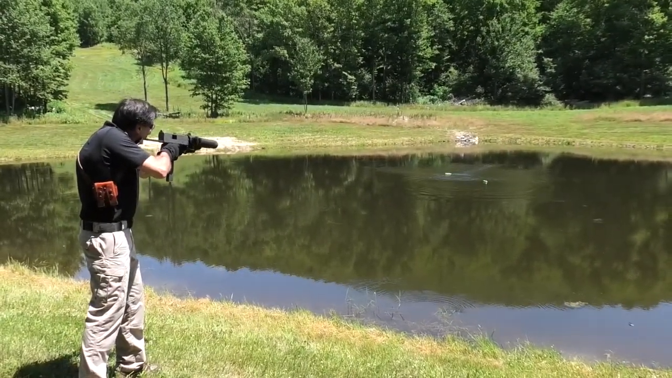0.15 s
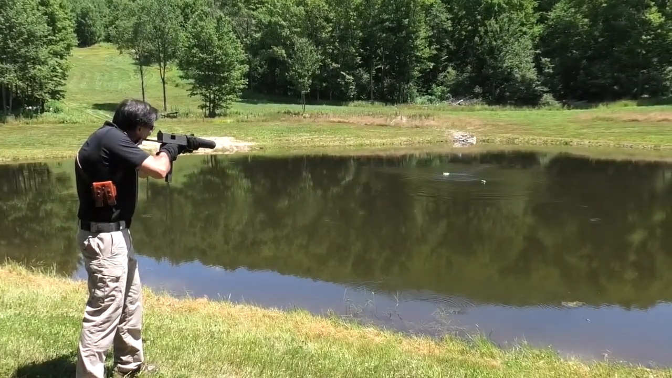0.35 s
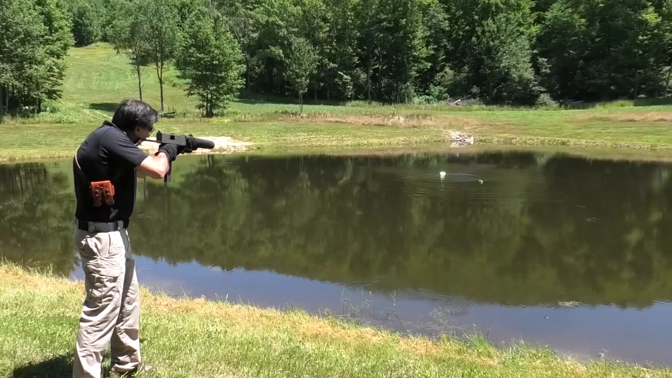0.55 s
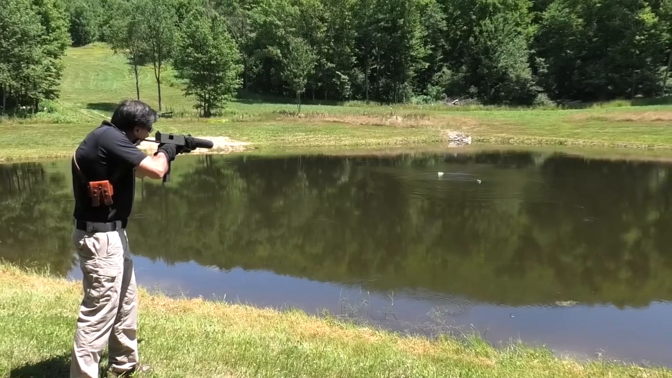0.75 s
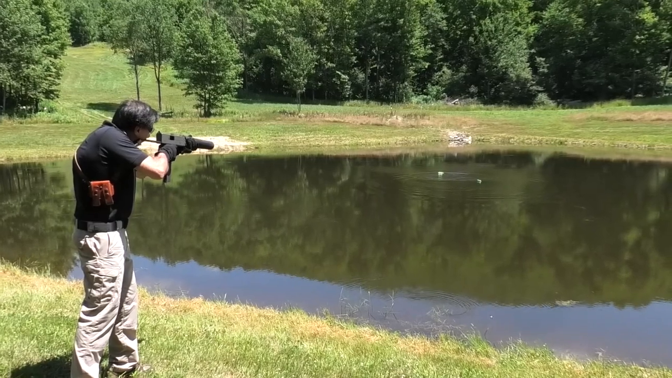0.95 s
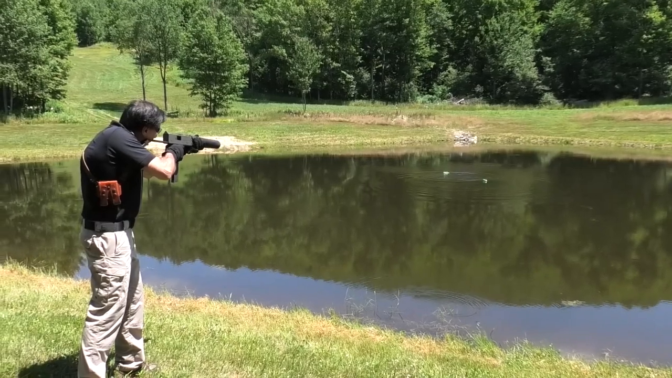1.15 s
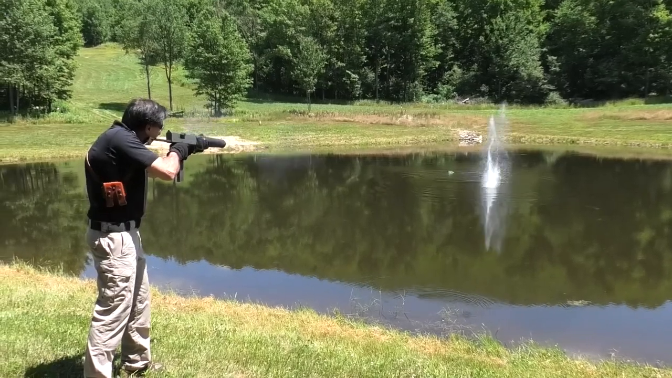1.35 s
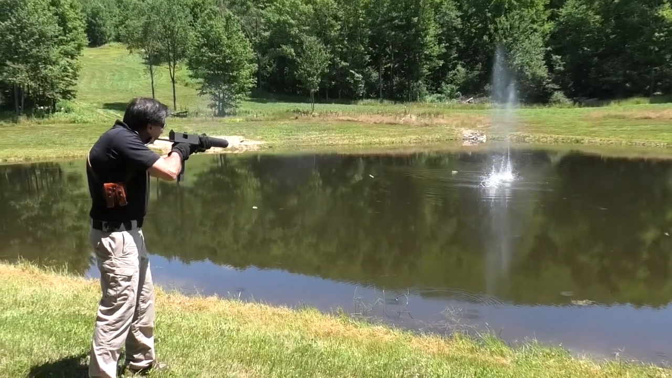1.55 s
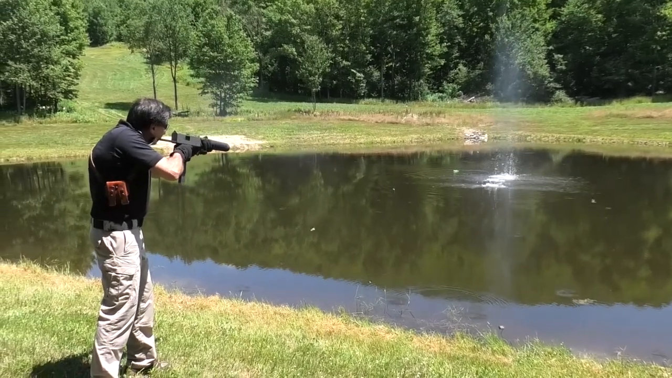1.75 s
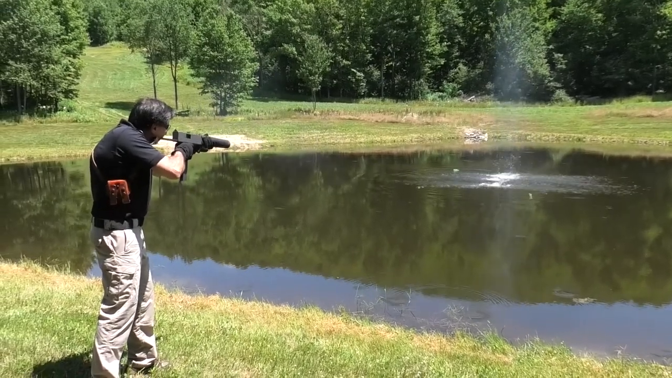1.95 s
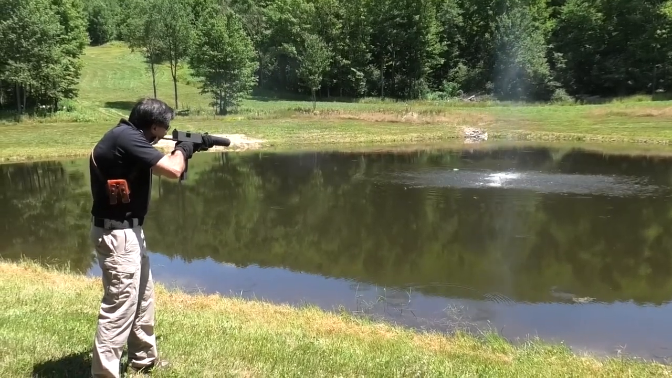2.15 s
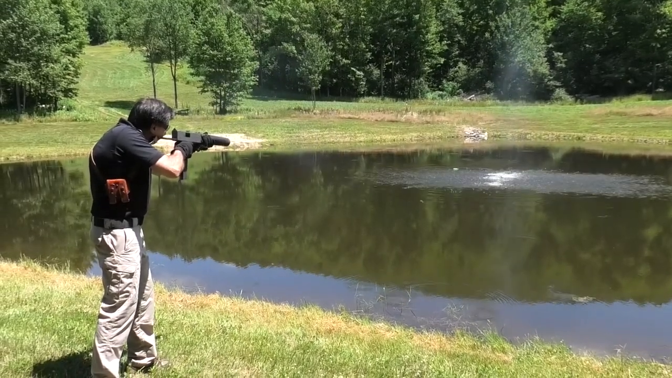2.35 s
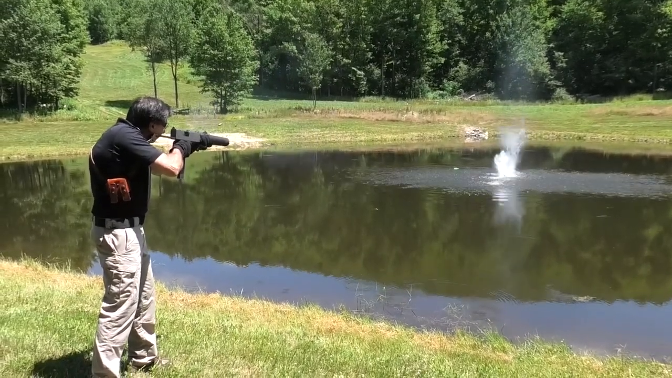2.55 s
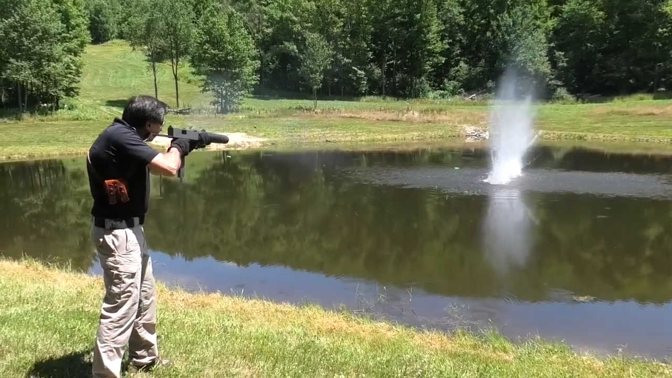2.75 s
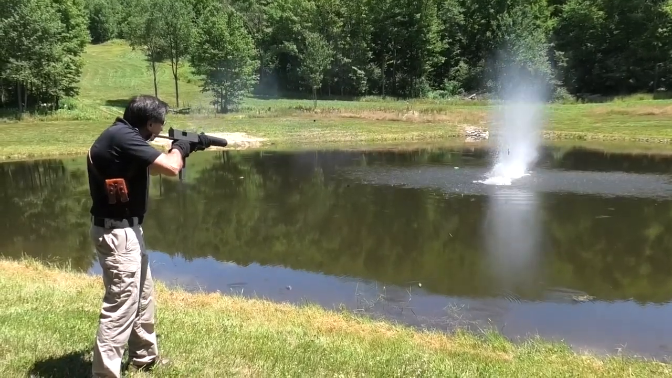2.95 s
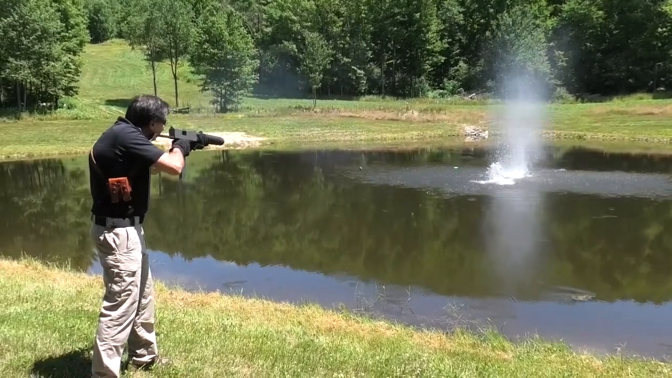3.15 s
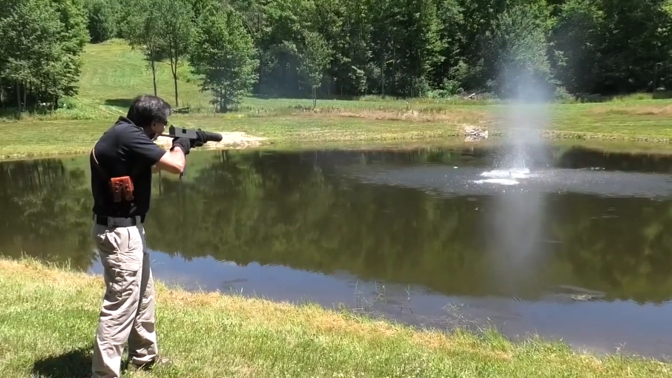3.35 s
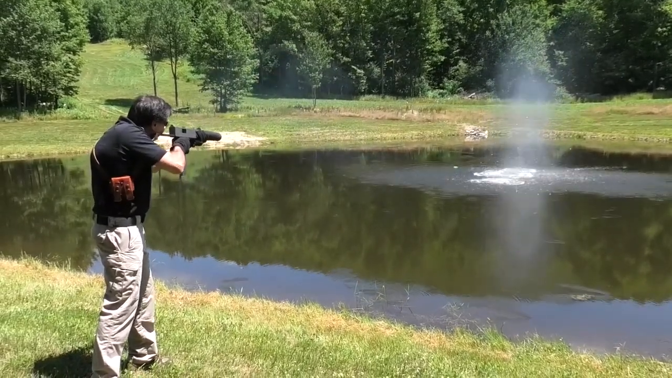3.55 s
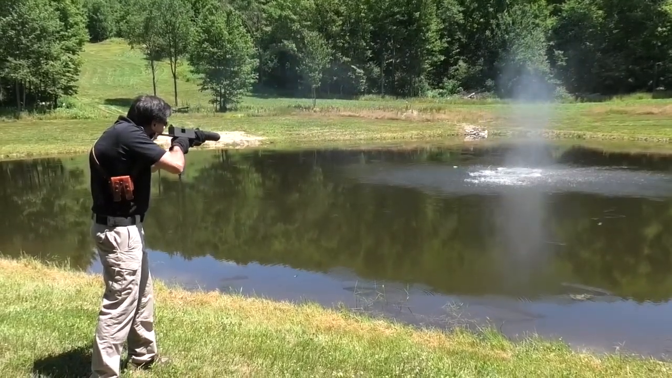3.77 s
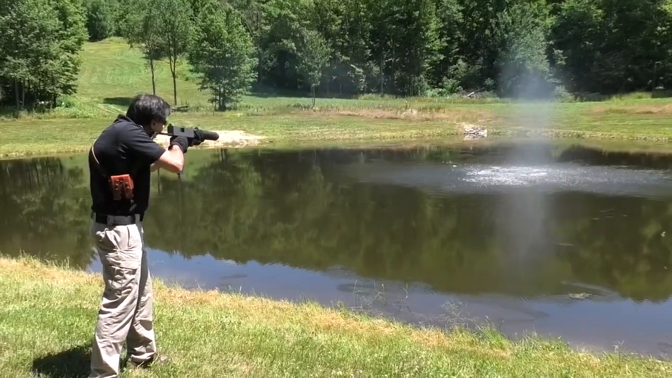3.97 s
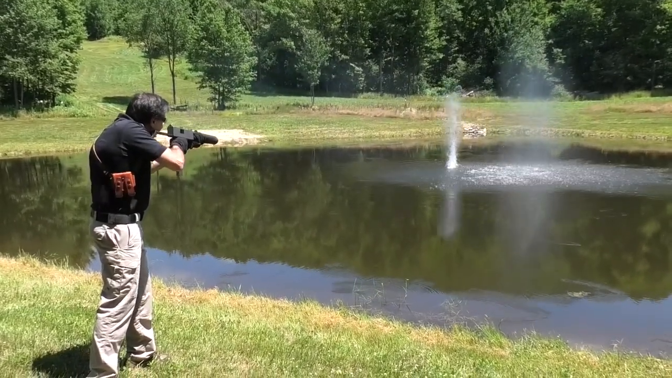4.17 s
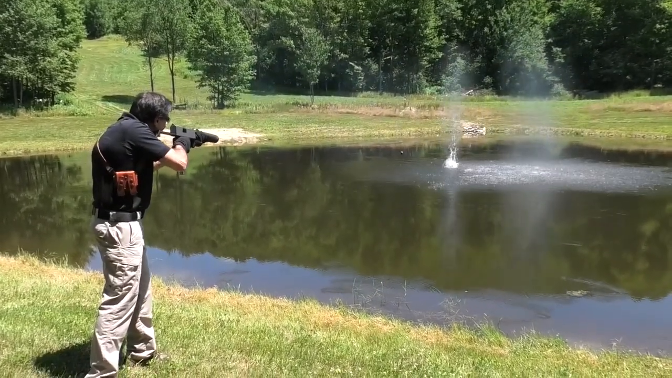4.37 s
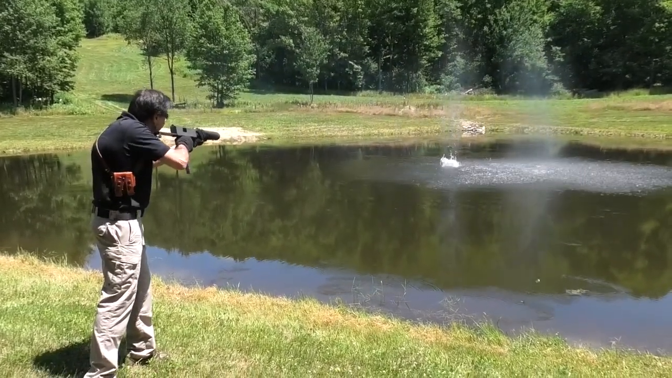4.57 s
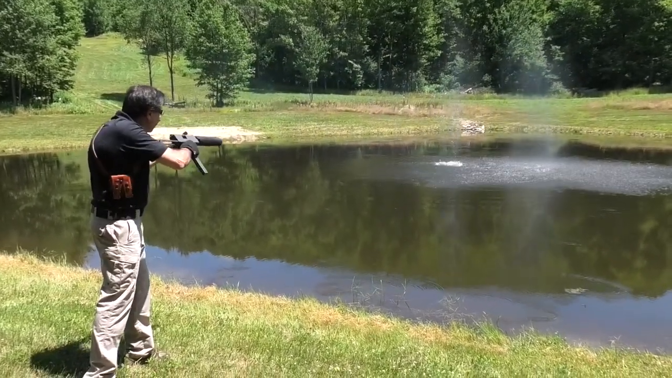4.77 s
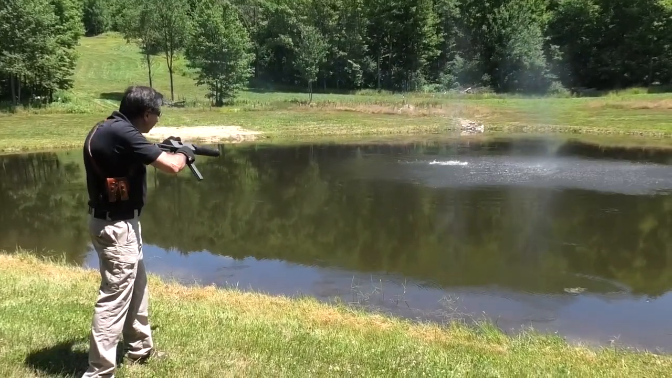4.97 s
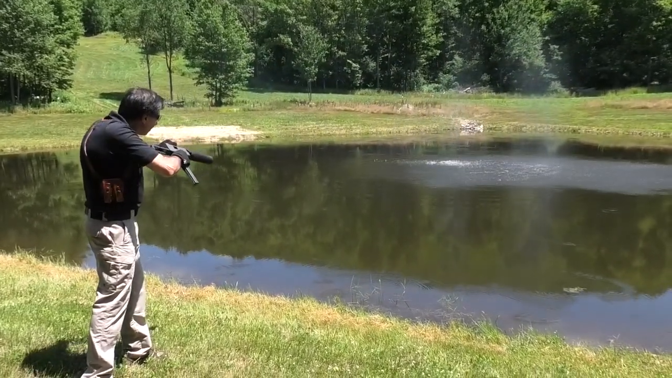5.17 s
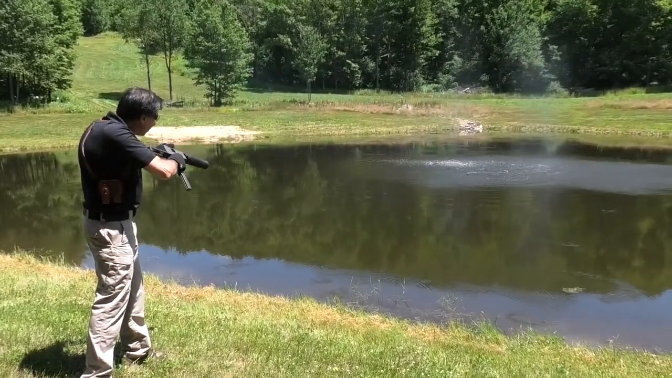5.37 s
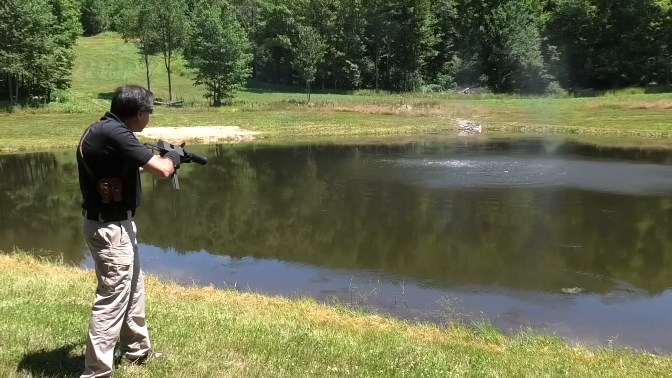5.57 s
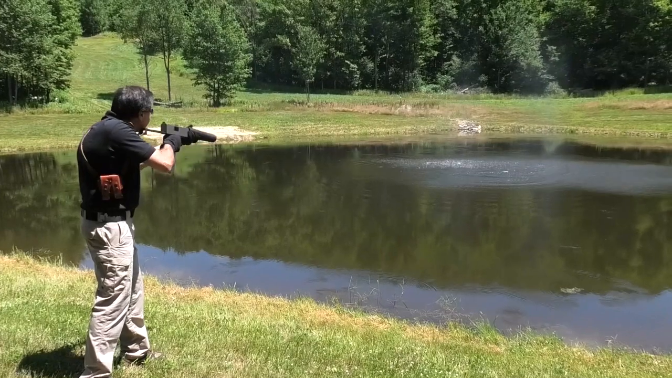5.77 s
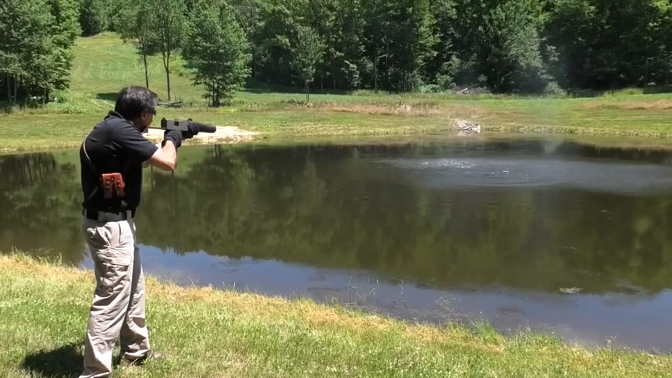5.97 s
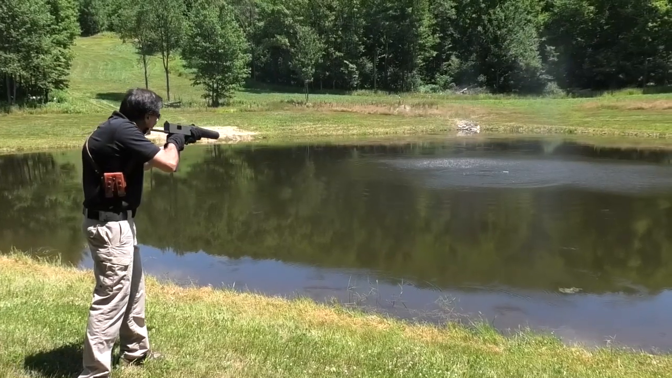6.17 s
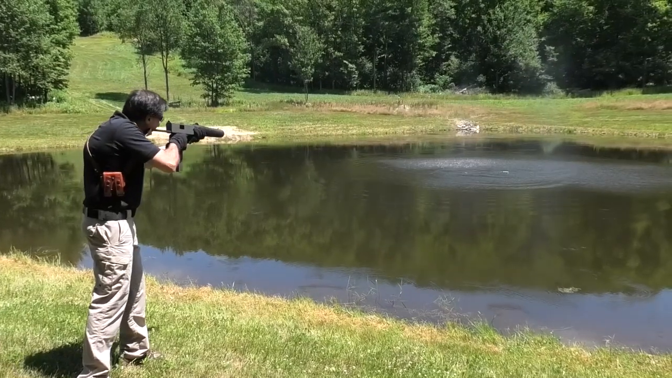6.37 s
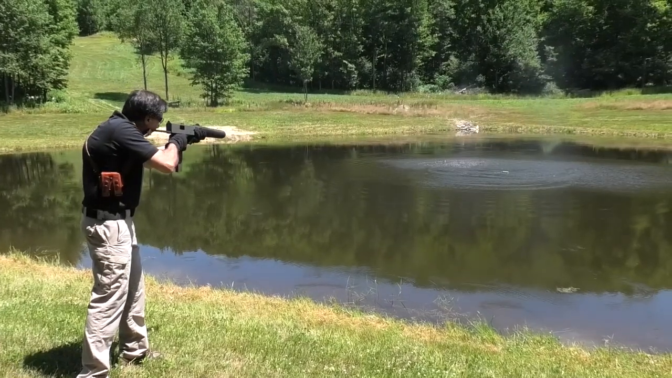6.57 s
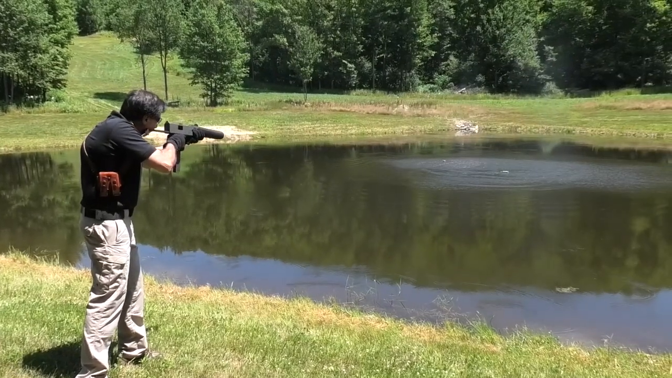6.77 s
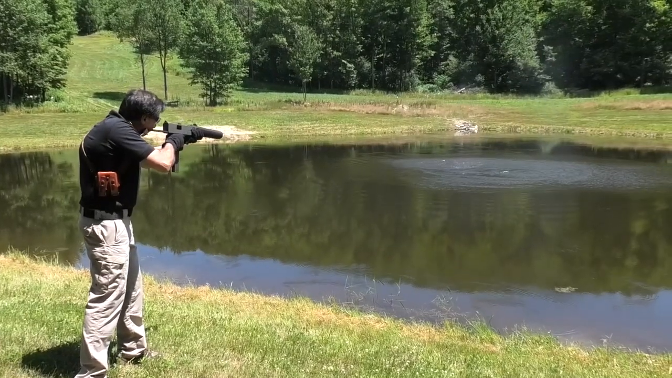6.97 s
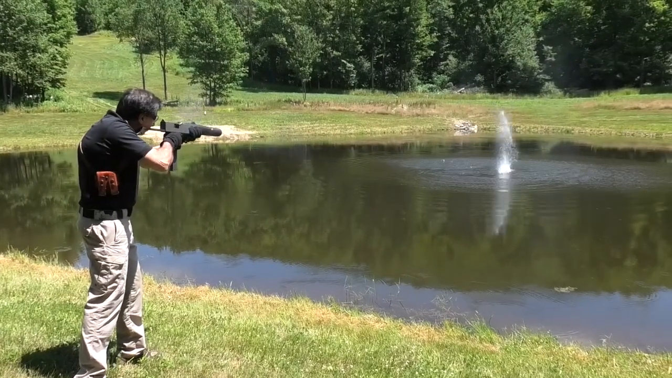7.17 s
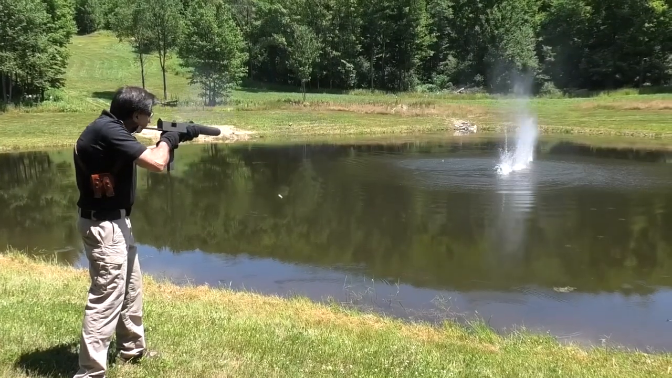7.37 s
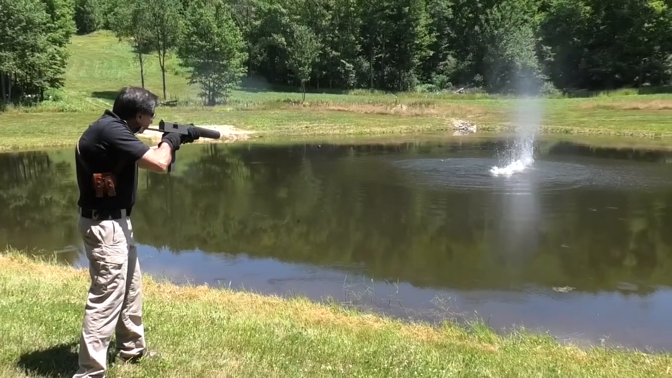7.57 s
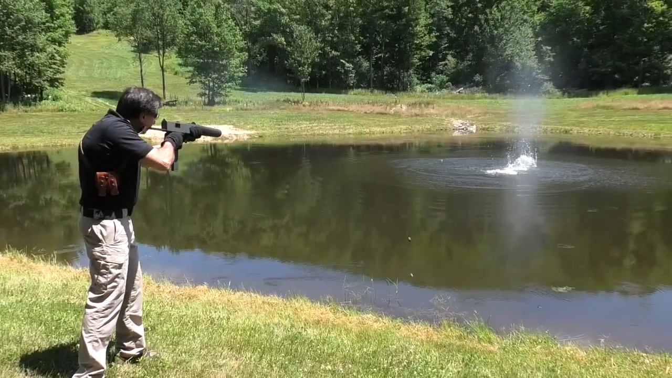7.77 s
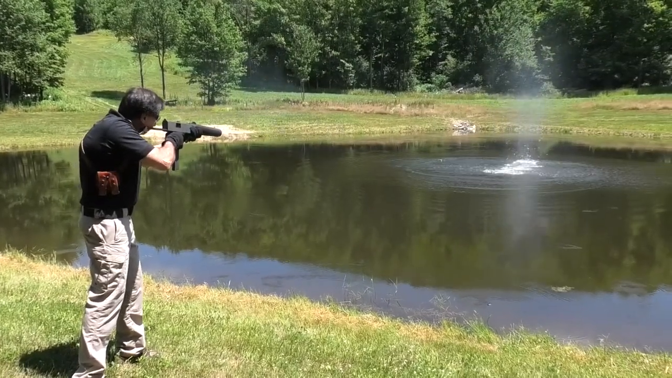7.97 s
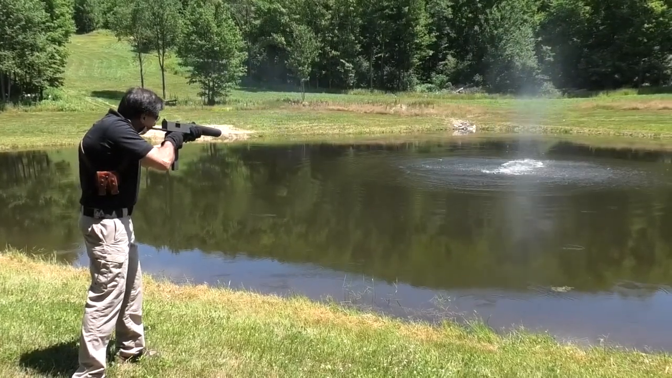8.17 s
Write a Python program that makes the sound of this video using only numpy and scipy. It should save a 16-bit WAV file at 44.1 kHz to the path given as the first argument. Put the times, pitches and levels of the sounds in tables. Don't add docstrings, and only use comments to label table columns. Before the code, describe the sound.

Close, dry metallic bursts from a silenced gun, each followed by plopping water hits and hissing echo, amid light breeze, birdsong and handling clicks.

```python
import sys
import numpy as np
from scipy import signal
from scipy.fft import rfft, irfft, next_fast_len
from scipy.io import wavfile
from scipy.ndimage import uniform_filter1d

SR = 44100
rng = np.random.default_rng(int(sys.argv[2]) if len(sys.argv) > 2 else 0)


def voltage_ratio(decibels):
    exponent = np.asarray(decibels, float) / 20
    return 10 ** exponent


def output_pcm(signal):
    pcm = np.clip(np.atleast_2d(signal).T, -1, 1) * 32767
    wavfile.write(sys.argv[1], SR, np.round(pcm).astype(np.int16))


N = 362502
FAST = next_fast_len(N)
T = np.arange(4096) / SR

# start_s, sear_db, first_rub_db, second_rub_db, first_rub_delay_s
PULLS = [
    (1.2245, -5.5, -19, -12, 0.011),
    (2.4767, -7.5, -19, -9.5, 0.012),
    (4.04, -10, -18, -10, 0.0123),
    (7.1007, -8, -17.5, -11, 0.013),
]
# start_s, gas_crack_db, muzzle_pop_db, bolt_stop_db
SHOTS = [(1.259, 0, -19.5, -33.5), (1.3106, -10, -21, -27), (1.365, -8.5, -22, -26.5),
         (1.4172, -11, -20, -23), (2.5085, -3.5, -15, -23), (2.563, -9, -19.5, -27),
         (2.613, -10.5, -20.5, -26), (2.6615, -10, -19, -26), (2.7097, -11, -20.5, -26.5),
         (2.7618, -10, -17.5, -30), (2.809, -10, -22.5, -22), (4.0729, -3, -13, -23),
         (7.133, -5.5, -13, -22.5), (7.181, -10, -21.5, -26), (7.2294, -11.5, -24, -25),
         (7.2778, -10.5, -23, -25), (7.325, -11, -23.5, -23)]
# start_s, level_db, pitch_hz, t60_s, churn_db
PLUNGES = [(1.3695, -11.5, 150, 0.024, -6), (1.421, -12, 123, 0.02, -9), (1.461, -20, 191, 0.066, -6),
           (1.5263, -10.5, 203, 0.057, -4.5), (2.623, -16.5, 257, 0.042, -4), (2.676, -21, 179, 0.047, 1),
           (2.7627, -8.5, 142, 0.024, 0), (2.821, -24.5, 169, 0.074, -4), (2.873, -11.5, 710, 0.027, -4),
           (2.877, -22, 266, 0.085, -17), (2.888, -25.5, 250, .1, -10), (2.9195, -16, 767, 0.048, 6.5),
           (4.189, -10.5, 218, 0.045, 0), (7.2402, -15, 222, 0.029, -17.5), (7.285, -23.5, 175, 0.03, 12),
           (7.344, -23, 167, 0.031, -12), (7.398, -12, 260, 0.019, 8.5), (7.4519, -8, 590, 0.018, -16),
           (7.4521, -4.5, 248, 0.026, -13)]
# start_s, ring_db, crack_db
LATCH_HITS = [
    (5.310, -51, -22),
    (5.4447, -26, -12.5),
]


def curve(table, hz):
    f, db = np.transpose(table)
    return np.interp(np.log(np.maximum(hz, 1)), np.log(f), db)


def colour(x, table):
    cep = irfft(np.log(voltage_ratio(curve(table, np.arange(257) * SR / 512))))
    cep[1:256] *= 2
    cep[257:] = 0
    h = irfft(np.exp(rfft(cep)))
    h = h / np.sqrt(np.sum(h ** 2))
    h = h.reshape((1,) * (x.ndim - 1) + (-1,))
    return signal.fftconvolve(x, h, axes=-1)[..., :x.shape[-1]]


def band(x, hz, octaves):
    edges_hz = np.clip(hz * 2 ** (np.array([-.5, .5]) * octaves), 20, .45 * SR)
    y = signal.sosfilt(signal.butter(2, edges_hz, "band", fs=SR, output="sos"), x)
    return y / y.std()


def fade(t, t60, rise=0.00015):
    t = np.maximum(t, 0)
    return (1 - np.exp(-t / rise)) * np.exp(-np.log(1000) * t / t60)


def ring(t, hz, t60):
    return np.sin(2 * np.pi * hz * t) * fade(t, t60, rise=.0001)


def walk(rate_hz):
    k = int(SR / rate_hz)
    steps = np.repeat(rng.standard_normal(N // k + 1), k)
    return 2.26 * uniform_filter1d(uniform_filter1d(steps, k), k)[:N]


def add(out, s, x, pan_db=0., wide=None):
    i = int(s * SR)
    pair = x * voltage_ratio(np.array([[pan_db], [-pan_db]]) / 2)
    if wide is not None:
        pair = pair + wide * np.array([[1], [-1]])
    out[:, i:i + len(x)] += pair[:, :N - i]


def since_blast(t):
    starts_s = np.sort([-99] + [row[0] for row in SHOTS + PLUNGES])
    return t - starts_s[np.searchsorted(starts_s, t) - 1]


def clamped(depth, release_s):
    return 1 - depth * np.exp(-since_blast(np.arange(N) / SR) / release_s)


def returns(layer, order):
    # return_db, brighter_db_per_layer, deeper_db, decay_stretch
    aims = [
        (-1.43, 1.56, 4.5, 0.99),
        (1.5, 0.15, -5, 0.96),
        (0.5, 0.34, 2, 0.99),
        (1.33, 0.2, 0.5, 0.97),
    ]
    duck_db, recover_s = 37, 0.45
    _, calm_db, db, build_s, t60, late_db, late_t60 = layer
    t = np.arange(0, N + 128, 128) / SR
    shot_s = np.array(SHOTS)[:, :1]
    string = np.searchsorted(np.array(PULLS)[:, 0], shot_s[:, 0]) - 1
    aim_db, bright_db, deep_db, stretch = np.array(aims)[string].T
    age_s = np.maximum(t - shot_s, 0)
    build = 1 - np.exp(-(age_s / build_s) ** 2)
    early = voltage_ratio(-120 * age_s / (t60 * stretch[:, None]))
    late = voltage_ratio(2 * late_db - 120 * age_s / late_t60)
    shot_db = db + aim_db + order * bright_db + (order < -1) * deep_db
    power = voltage_ratio(2 * calm_db) + voltage_ratio(2 * shot_db) @ (build * (early + late))
    level_db = 10 * np.log10(power) - duck_db * np.exp(-since_blast(t) / recover_s)
    return np.interp(np.arange(N) / SR, t, level_db)


def air():
    # freq_hz, density_db_per_hz
    breeze = [(12, -29), (20, -9), (70, 3.5), (193, 5), (248, -0.5), (400, 1), (520, -54), (880, -120)]
    hz = np.arange(FAST // 2 + 1) * SR / FAST
    spectrum = rfft(rng.standard_normal((2, FAST))) * voltage_ratio(curve(breeze, hz))
    mid, side = irfft(spectrum, FAST)[:, :N]
    level = voltage_ratio(-57.5 + 0.82 * walk(3.1)) * clamped(0.87, 0.49) / mid.std()
    return level * np.array([mid + 0.77 * side, mid - 0.8 * side])


def wash():
    # centre_hz, calm_db, return_db, build_s, t60_s, late_return_db, late_t60_s
    rumble = (187, -72, -6, 0.19, 1.5, -25.5, 5)
    far_bank = (657, -59.5, -4.5, 0.39, 2, -27, 6)
    trees = (2212, -61.5, 5.5, 0.75, 1.3267, -36.5, 4.5)
    spray = (6304, -72, 4.5, 0.36, 0.9917, -47.5, 5)
    haze = (10998, -76, 2.5, 0.43, 0.6665, -54, 6)
    # freq_hz, density_db_per_hz
    mean_colour = [(15, -49), (25, -25), (60, -22.5), (130, -7.5), (210, -2), (400, -4), (650, -4),
                   (1090, -9.5), (1400, -10.5), (2300, -12.5), (4200, -18.5), (7250, -23.5), (10300, -29),
                   (12500, -47), (16400, -64)]
    # freq_hz, side_minus_mid_db
    side_colour = [(60, -3), (110, -10), (200, -15.5), (380, -9), (700, -7), (1290, -4), (2380, -3),
                   (4400, -5), (8120, -19), (15000, 15.5)]
    # freq_hz, left_minus_right_db
    balance = [(300, 1), (700, -2.5), (4400, -0.5)]
    layers = rumble, far_bank, trees, spray, haze
    hz = np.arange(FAST // 2 + 1) * SR / FAST
    drop_gain = voltage_ratio(np.minimum(2.0 * rng.exponential(size=(2, FAST)), 9.5))
    drops = (rng.random((2, FAST)) < 900 / SR) * drop_gain
    patter = rfft(drops * rng.standard_normal((2, FAST))) * 2.3 * np.clip(hz / 6000, 0, 1)
    mid, side = rfft(rng.standard_normal((2, FAST))) + patter
    ground = 1 + 0.081 * np.exp(-2j * np.pi * hz / 670)
    side = side * voltage_ratio(curve(side_colour, hz))
    mid, side = voltage_ratio(curve(mean_colour, hz)) * ground * np.array([mid, side])

    centres = np.log([layer[0] for layer in layers])
    edges_hz = [80, 350, 1200, 4000, 9000, 13000]
    lift = []
    for k, layer in enumerate(layers):
        inside = (hz >= edges_hz[k]) & (hz < edges_hz[k + 1])
        own_db = 10 * np.log10(2 * np.sum(np.abs(mid[inside]) ** 2) / FAST ** 2)
        lift.append(returns(layer, order=k - 1.5) - own_db)
    lift = np.array(lift)

    lean = voltage_ratio(curve(balance, hz) / 2)
    pair = np.array([(mid + side) * lean, (mid - side) / lean])
    out, swell, octave = 0, walk(70), np.log2(np.maximum(hz, 1))
    step = slice(0, N, 8)
    for c in 25 * 2 ** np.arange(0, 9.6, .5):
        shape = np.cos(np.pi / 2 * np.clip((octave - np.log2(c)) * 2, -1, 1)) ** 2
        weights = np.array([np.interp(np.log(c), centres, row) for row in np.eye(len(layers))])
        db = weights @ lift[:, step] + (.9 * swell + .6 * walk(22))[step]
        out = out + np.repeat(voltage_ratio(db), step.step)[:N] * irfft(shape * pair, FAST)[:, :N]
    return out


def cloth():
    # start_s, swell_s, hold_s, level_db
    moves = [
        (-.3, 0.3, .05, -69.5),
        (1.9, 0.48, .05, -60),
        (3.41, 0.54, 0.059, -50),
        (4.16, 0.46, 0.14, -44),
        (5.19, 0.24, 1, -57),
        (7.89, .3, .1, -73),
    ]
    swell_db, fall_db_per_s = 21.5, 55
    t = np.arange(N) / SR
    gain = 0
    for s, swell_s, hold_s, db in moves:
        before = np.maximum(s + swell_s - t, 0) / swell_s
        after_s = np.maximum(t - s - swell_s - hold_s, 0)
        gain = gain + voltage_ratio(db - swell_db * before - fall_db_per_s * after_s)
    return gain


def rustle():
    # centre_hz, calm_db, return_db, build_s, t60_s, late_return_db, late_t60_s
    mist = (9704, -74.5, -1, 0.6, 0.66, -45.5, 4)
    # time_s, crackle_share
    hands = [
        (3.6, 0.25),
        (5.2, 1),
        (6.6, 1),
        (6.8, 0.078),
    ]
    t = np.arange(N) / SR
    sparks = (rng.random(N) < 35 / SR) * voltage_ratio(np.minimum(7.0 * rng.exponential(size=N), 10))
    sparks = signal.lfilter([1], [1, -np.exp(-1 / (0.0012 * SR))], sparks)
    crackle = 1 + 1.6 * np.interp(t, *np.transpose(hands)) * sparks
    mid, side = band(rng.standard_normal((2, N)), mist[0], octaves=1.12) * crackle
    mid = mid + 0.3 * np.roll(mid, 30)
    side = side + 0.3 * np.roll(side, 30)
    level = (voltage_ratio(returns(mist, order=0)) + cloth()) * voltage_ratio(0.18 * walk(5.9))
    return level * np.array([mid + 0.1 * side, mid - 0.57 * side])


def whistle(out, s, hz, db, pan_db):
    t = np.arange(s[0], s[-1], 1 / SR)
    ends = np.clip(np.minimum(t - s[0], s[-1] - t) / 0.0009, 0, 1)
    phase = 2 * np.pi * np.cumsum(np.interp(t, s, hz)) / SR
    x = np.sqrt(2) * voltage_ratio(np.interp(t, s, db)) * ends * np.sin(phase)
    flutter = np.sqrt(150) * uniform_filter1d(rng.standard_normal(len(t)), size=150)
    x = x * voltage_ratio(2.0 * flutter)
    add(out, s[0], x, pan_db)
    leaves = 0.025 * rng.standard_normal((2, len(T))) * fade(T, 0.31, rise=0.0054)
    wet = signal.fftconvolve(x[None], leaves, axes=1)
    add(out, s[0], wet[0], wide=0.8 * wet[1])


def birds(out):
    # start_s, length_s, from_hz, to_hz, level_db
    song = [(0, 0.0217, 4670, 3850, -61), (0.015, 0.019, 3770, 3882, -59), (0.044, 0.048, 3305, 2240, -58),
            (0.107, 0.03, 2590, 3120, -55), (0.127, .032, 3100, 2250, -62), (0.518, .017, 3800, 4500, -66),
            (.532, .015, 4500, 3500, -64), (.547, 0.041, 3400, 3160, -58), (0.583, 0.035, 3146, 2320, -63),
            (0.617, 0.026, 2350, 3320, -60), (.64, .032, 3050, 2570, -61), (1.105, 0.018, 4550, 4300, -68),
            (1.125, .03, 4350, 4800, -66), (1.178, 0.024, 3930, 4800, -61), (1.184, 0.032, 4700, 3220, -59),
            (5.63, .03, 3050, 2680, -61), (5.722, .016, 3200, 3900, -52), (5.741, 0.049, 3870, 2870, -51),
            (6.359, 0.046, 3960, 2160, -59), (6.422, 0.036, 1930, 3620, -54.5),
            (6.474, 0.019, 3860, 2950, -50), (7.011, 0.037, 2890, 4050, -66),
            (7.068, 0.036, 3750, 2650, -65)]
    # start_s, level_db, pitch_hz
    chips = [
        (0.142, -65, 8490),
        (0.2907, -50, 8450),
        (0.6524, -44.5, 8300),
        (1.005, -43.5, 8300),
    ]
    for s, length_s, from_hz, to_hz, db in song:
        middle_hz = from_hz + 0.67 * (to_hz - from_hz)
        times_s = s + length_s * np.array([0, .5, 1])
        whistle(out, times_s, [from_hz, middle_hz, to_hz], db + np.array([1, 0, 1]), pan_db=-10.5)

    db = -72
    for k in range(8):
        s, top_hz = 0.055 + k * .1248, 5100 + k * 310
        whistle(out, [s, s + (top_hz - 3700) / 78000], [top_hz, 3700.], [db - 3, db + 1], pan_db=13.0)
        if k > 3:
            whistle(out, [s + .06, s + .082], [6500., 7800.], [db - 5, db - 3], pan_db=13.0)

    t = np.arange(8192) / SR
    for (s, db, hz), noise in zip(chips, rng.standard_normal((len(chips), len(t)))):
        narrow = band(noise, hz, octaves=0.033)
        broad = band(noise, 1.1 * hz, octaves=0.35)
        x = narrow * (fade(t, 0.054, rise=0.0016) + 0.098 * fade(t, .8)) + 0.36 * broad * fade(t, 0.12)
        add(out, s, 0.63 * voltage_ratio(db) * x, pan_db=4.5)


def snaps(out):
    # start_s, level_db, centre_hz
    clicks = [(1.669, -23, 4600), (1.897, -40, 12000), (2.098, -38, 11000), (2.432, -36, 7930),
              (3.24, -36, 10500), (3.52, -36, 10500), (3.9, -36, 8000), (3.937, -27, 5000),
              (4.498, -30, 9000), (4.532, -31, 11000), (4.627, -25, 7000), (4.7234, -27, 7400),
              (4.763, -32, 10000), (4.94, -35, 11500), (4.9863, -37, 7400), (5.018, -36, 11000),
              (5.0576, -37, 13000), (5.087, -38, 6100), (5.1344, -43, 9000), (5.215, -36, 9360),
              (5.614, -38, 7500), (5.762, -31, 6000), (5.85, -38, 3300), (6.1822, -36.5, 10100),
              (6.4035, -39, 5000), (6.489, -34, 4500), (6.503, -41, 5500), (6.839, -45, 3000)]
    for (s, db, hz), noise in zip(clicks, rng.standard_normal((len(clicks), 1024))):
        x = band(noise, hz, octaves=0.9) * fade(T[:1024], 0.015)
        add(out, s - .0005, 0.53 * voltage_ratio(db) * x, pan_db=-1.0)


def handling(out):
    # start_s, level_db, centre_hz, t60_s
    metal_ticks = [(0.164, -30, 8600, 0.029), (0.3093, -36, 9110, 0.036), (5.25, -17, 2900, 0.019),
                   (5.298, -26, 1470, 0.068), (5.423, -29, 1300, 0.013), (5.311, -17, 600, .03),
                   (5.655, -26.5, 7800, 0.05), (5.664, -27, 2230, 0.052), (5.7348, -18, 2930, 0.016),
                   (5.7524, -28.5, 3500, 0.03), (5.91, -33, 2264, 0.037), (5.9554, -42, 7670, 0.031),
                   (5.9942, -32, 1420, 0.037), (6.087, -25, 1670, 0.02), (6.194, -31, 1260, 0.036),
                   (6.32, -31.5, 1525, 0.051), (6.4992, -29.5, 10300, 0.036), (6.572, -17.5, 3650, 0.0083),
                   (8.167, -23.5, 6070, 0.16),
        (8.213, -22.5, 7500, 0.034),
    ]
    # pitch_hz, level_db, t60_s
    latch_modes = [(936, -15, 0.035), (1350, -4, .04), (1600, -2, 0.06), (2350, -5, 0.058),
                   (5500, 3, 0.027), (6660, 14, 0.015), (7440, 9, 0.031)]
    # freq_hz, density_db_per_hz
    latch_crack = [(350, -37), (600, 1.5), (1450, 2.5), (2750, -8), (5960, -8), (7540, -4.5), (8310, -10),
                   (10200, -5.5), (16400, -29)]
    ticks = metal_ticks
    for (s, db, hz, t60), noise in zip(ticks, rng.standard_normal((len(ticks), 2, len(T)))):
        x = band(noise[0], hz, octaves=0.5) + 0.78 * band(noise[1], 3000.0, octaves=3.2)
        add(out, s - .0005, 0.24 * voltage_ratio(db) * x * fade(T, t60), pan_db=-3.5)
    crack_noise = colour(rng.standard_normal((2, len(T))), latch_crack)
    for (s, ring_db, crack_db), noise in zip(LATCH_HITS, crack_noise):
        modes = sum(voltage_ratio(g_db) * ring(T, hz, t60) for hz, g_db, t60 in latch_modes)
        crack = band(noise, 4600.0, octaves=5.7) * fade(T, 0.042) + 0.051 * ring(T - .004, 930., 0.31)
        add(out, s, voltage_ratio(ring_db) * modes + voltage_ratio(crack_db) * crack, pan_db=3.5)


def echoes(out):
    # start_s, level_db, centre_hz, width_octaves, t60_s
    banks = [(1.779, -27, 1720, 1.5, 0.84), (4.419, -32, 3880, 1.8, 0.38), (4.592, -26.5, 1390, 2.05, 0.8),
             (4.622, -31.5, 2200, 1.3, .25), (4.77, -29.5, 900, 1.3, 0.35), (3.85, -32, 544, 1.8, 0.89),
             (5.5, -42.5, 6000, 1.3, 0.7), (6.25, -37, 1360, 0.17, 0.064), (6.755, -52, 1420, .25, 0.28),
             (7.841, -27.5, 450, 0.95, 1), (7.76, -34, 2500, 1.2, 1)]
    t = np.arange(SR // 2) / SR
    for (s, db, hz, octaves, t60), noise in zip(banks, rng.standard_normal((len(banks), 2, len(t)))):
        spiky = noise * np.abs(noise) ** 1.65
        grain = voltage_ratio(2.5 * walk(120)[:len(t)])
        mid, side = voltage_ratio(db) * band(spiky, hz, octaves) * fade(t, t60, rise=0.0045) * grain
        add(out, s, mid, pan_db=-2.5, wide=0.18 * side)


def impacts(out):
    # start_s, level_db, t60_s
    slaps = [(1.459, -30, 0.097), (1.5144, -27, 0.16), (2.8605, -17, 0.026), (2.8705, -15.5, 0.059),
             (2.9086, -24, 0.056), (2.9184, -15.5, 0.046), (4.1892, -8, 0.014), (7.341, -20.5, 0.066),
             (7.3908, -16, 0.033), (7.439, -13.5, 0.019), (7.4462, -17, 0.043)]
    # freq_hz, density_db_per_hz
    slap_colour = [(300, -13), (800, 4), (1500, -3), (4000, -7.5), (9000, -10.5), (16000, -19)]
    noise = colour(rng.standard_normal((len(slaps), 2, len(T))), slap_colour)
    for (s, db, t60), (mid, side) in zip(slaps, noise):
        env = .5 * voltage_ratio(db) * fade(T, t60)
        add(out, s - .0005, env * mid, wide=0.33 * env * side)

    churn = band(rng.standard_normal((len(PLUNGES), len(T))), 680.0, octaves=2.33)
    gain_hold = .4 + .6 / (1 + np.exp((T - .0105) / .001))
    high_pass = signal.butter(2, 70., "high", fs=SR)
    for (s, db, hz, t60, churn_db), rough in zip(PLUNGES, churn):
        turns = hz * (T + 1.1 * 0.0018 * (1 - np.exp(-T / 0.00044)))
        water = 0.62 * voltage_ratio(churn_db) * rough * fade(T - .001, 0.67, rise=0.0011)
        plop = (np.sin(2 * np.pi * turns) + water) * fade(T, t60, rise=0.00044) * gain_hold
        plop = voltage_ratio(db) * signal.lfilter(*high_pass, plop)
        add(out, s + .0008, plop, pan_db=-2.0, wide=0.14 * np.roll(plop, 40))


def action(out):
    # freq_hz, density_db_per_hz
    sear_colour = [(290, -71), (500, -13), (4270, 2.5), (4600, -3.5), (6070, -4.5), (9540, 0.5),
                   (11900, -7), (15200, -12), (16400, -38)]
    # freq_hz, density_db_per_hz
    slide_colour = [(180, -33), (300, -17), (1450, 2.5), (3400, -0.5), (6000, -5), (7330, -8), (9580, 0),
                    (13200, -10), (14800, -8), (16400, -28)]
    noise = rng.standard_normal((len(PULLS), 3, len(T)))
    until_shot = T < .035
    for (s, sear_db, rub_db, strip_db, rub_s), (thin, full, side) in zip(PULLS, noise):
        rub = voltage_ratio(rub_db) * fade(T - rub_s, 0.068, rise=0.00039) * until_shot
        sear = 0.47 * voltage_ratio(sear_db) * fade(T, 0.02) + rub
        strip = voltage_ratio(strip_db) * fade(T - .022, 0.028, rise=0.002) * until_shot
        x = sear * colour(thin, sear_colour) + strip * colour(full, slide_colour)
        add(out, s - .0008, x, pan_db=3.5, wide=0.12 * (sear + strip) * colour(side, slide_colour))


def rounds(out):
    # freq_hz, density_db_per_hz
    crack_colour = [(590, -24), (1000, 0.5), (1710, -3), (2270, -1), (2830, -4.5), (4910, -4), (5580, -21),
                    (6970, -4), (9560, -3.5), (14200, -7), (16400, -18)]
    # start_s, level_db, pitch_hz, t60_s
    thumps = [(1.2637, -6.5, 330, 0.018), (1.3158, -20, 330, 0.016), (1.4215, -16.5, 297, .016),
              (2.5128, -10, 244, 0.021), (2.568, -17, 380, 0.014), (2.8138, -17, 300, 0.022),
              (4.0788, -15.5, 210, .018), (7.139, -2, 320, 0.0049), (7.1859, -21, 300, 0.021),
              (7.3293, -19, 300, 0.017)]
    noise = rng.standard_normal((len(SHOTS), 2, len(T)))
    noise = colour(0.73 * noise * np.abs(noise) ** 0.56, crack_colour)
    clamp = 0.21 + 0.71 / (1 + np.exp((T - .0078) / 0.0022))
    scatter = rng.standard_normal((len(SHOTS), 3))
    jets = 1.04 * fade(T - .0006, 0.017, rise=0.0001)
    jets = jets + 0.82 * fade(T - .0032, 0.017) + 0.5 * fade(T - .0052, 0.021)
    bolt = fade(T - .0165, 0.032, rise=0.00053)
    bolt = bolt + 0.088 * fade(T - .027, 0.12, rise=0.01) + 0.37 * fade(T - .008, 0.054)
    for (s, crack_db, pop_db, stop_db), (mid, side), spread in zip(SHOTS, noise, scatter):
        a, b, c = 1 + .06 * spread
        ring_db = .4 * crack_db - 10.5 + 1.5 * spread[2]
        gas = 0.55 * voltage_ratio(crack_db) * jets * clamp
        stop = voltage_ratio(stop_db) * bolt
        pop = -ring(T - .0014, 765.0 * a ** .3, 0.011) + 0.4 * ring(T - .0048, 600.0 * b, 0.014)
        gas_front = 0.3 * voltage_ratio(crack_db) * ring(T - .0012, 5800.0 * b, 0.008)
        breech = ring(T - .0056, 5600. * a ** .5, 0.009) + 0.5 * ring(T - .0061, 5150. * b ** .5, 0.008)
        breech = breech + .1 * ring(T - .0056, 5300. * c, 0.04) + 0.15 * ring(T - .017, 1363.0 * b, 0.015)
        x = (gas + stop) * mid + gas_front + voltage_ratio(ring_db) * breech
        add(out, s - .0008, x, pan_db=2.5, wide=0.27 * (gas + stop) * side)
        add(out, s - .0008, 2.83 * voltage_ratio(pop_db) * pop, pan_db=3.5)
    for s, db, hz, t60 in thumps:
        thump = voltage_ratio(db) * (ring(T, hz, max(t60, .005)) + 0.048 * ring(T, 36.0, 0.0081))
        add(out, s, thump, pan_db=2.0, wide=0.25 * thump)


def scene():
    since_latch_s = np.arange(N) / SR - LATCH_HITS[-1][0]
    flinch = 1 - 0.96 * np.exp(-np.abs(since_latch_s) / 0.04) * (since_latch_s > 0)
    out = (wash() * clamped(0.95, 0.049) + air() + rustle() * clamped(0.51, 0.036)) * flinch
    for source in (action, rounds, impacts, echoes, handling, snaps, birds):
        source(out)
    return out


def roll_off(x):
    return signal.sosfilt(signal.butter(12, 15750, fs=SR, output="sos"), x)


def record(dry):
    mix = np.clip(dry, -1, 1)
    return roll_off(mix)


dry = scene()
out = record(dry)
output_pcm(out)
```